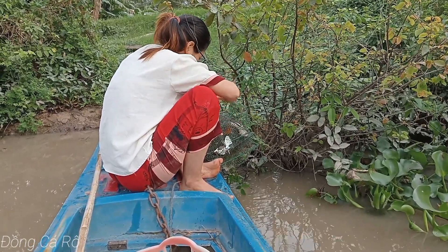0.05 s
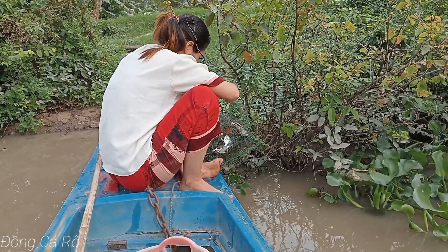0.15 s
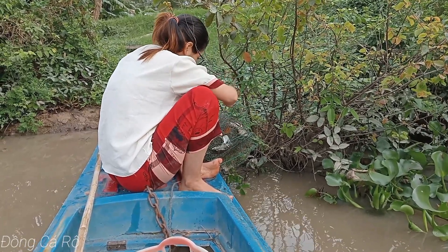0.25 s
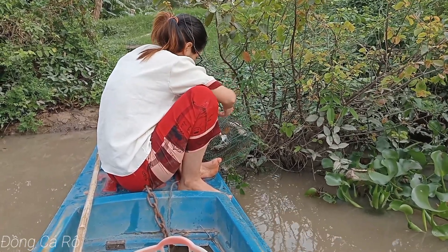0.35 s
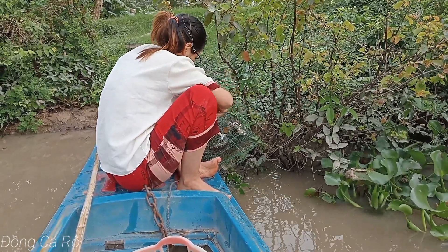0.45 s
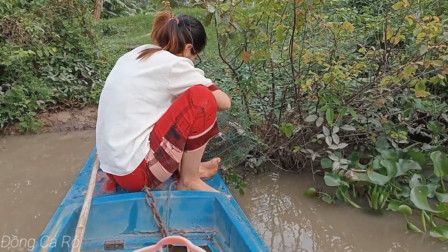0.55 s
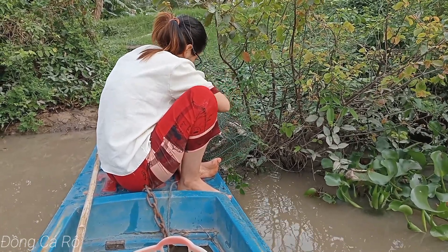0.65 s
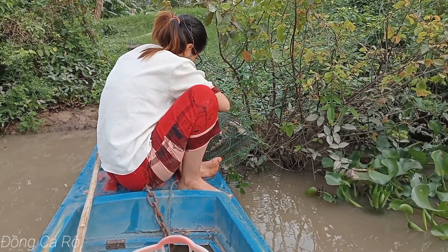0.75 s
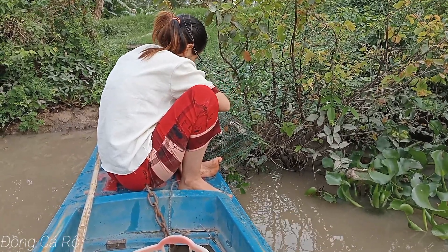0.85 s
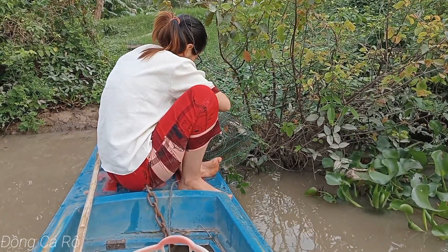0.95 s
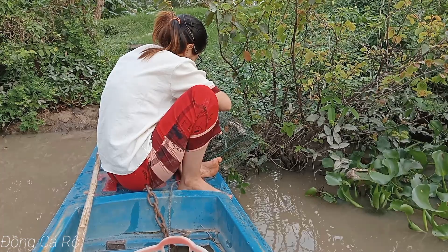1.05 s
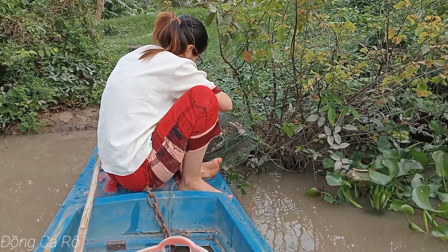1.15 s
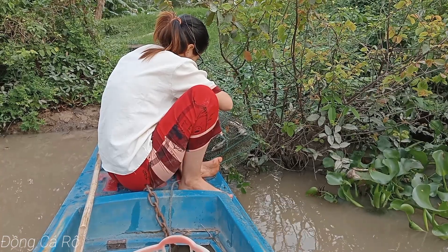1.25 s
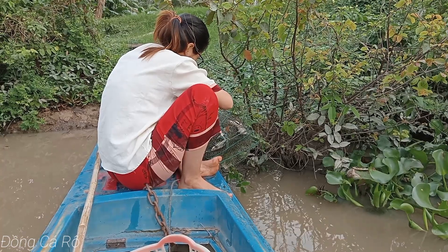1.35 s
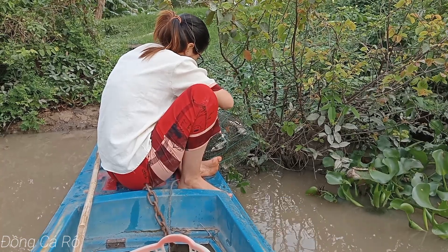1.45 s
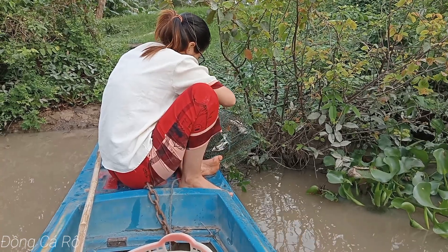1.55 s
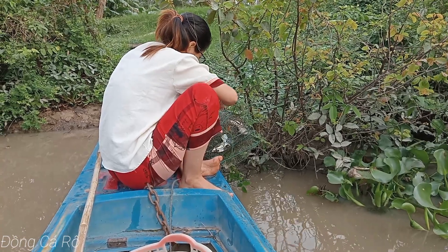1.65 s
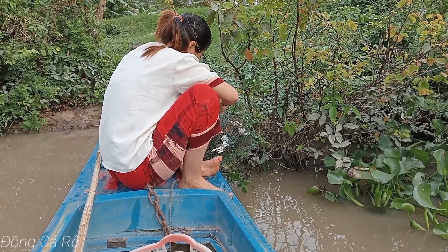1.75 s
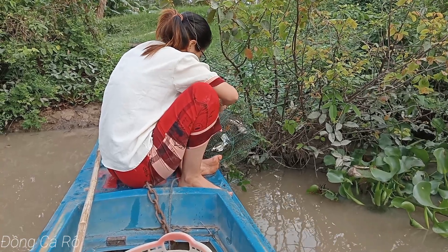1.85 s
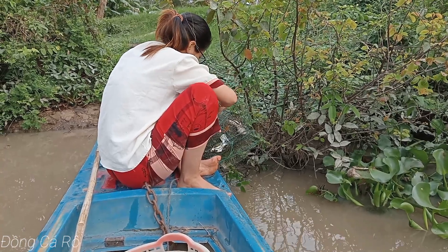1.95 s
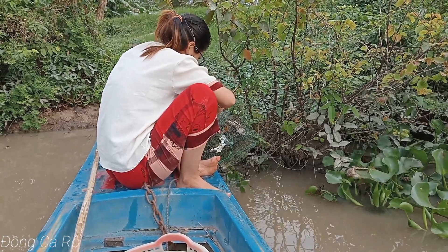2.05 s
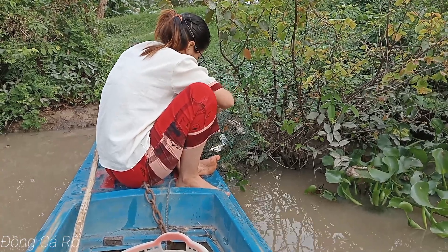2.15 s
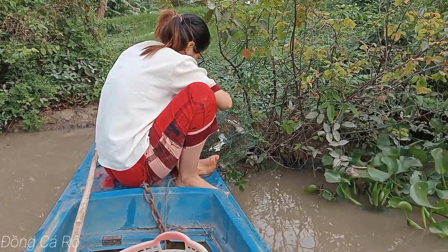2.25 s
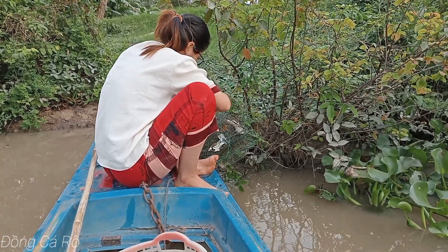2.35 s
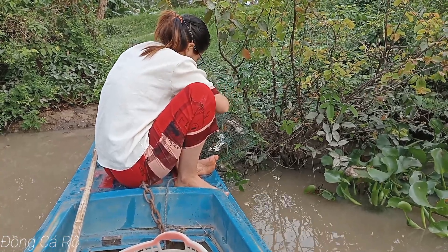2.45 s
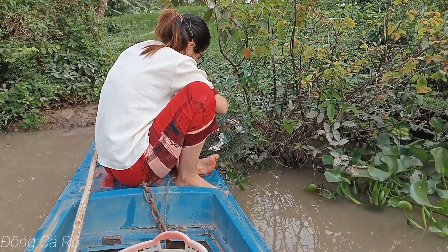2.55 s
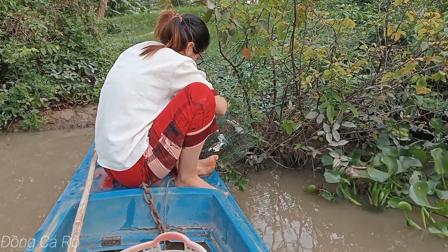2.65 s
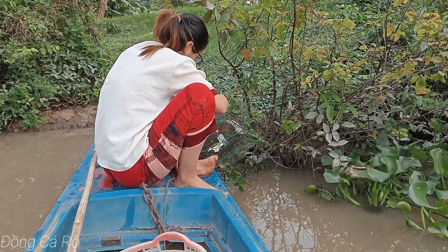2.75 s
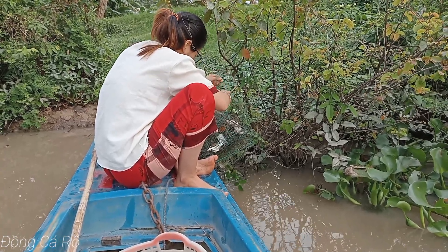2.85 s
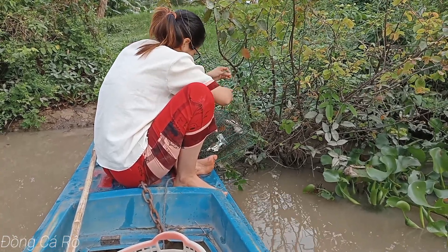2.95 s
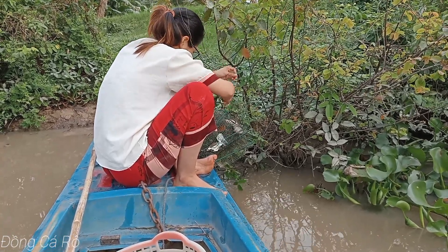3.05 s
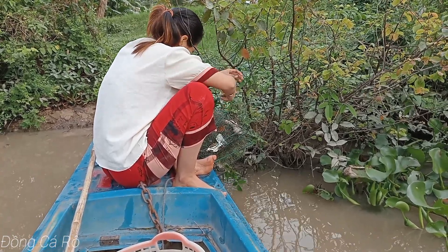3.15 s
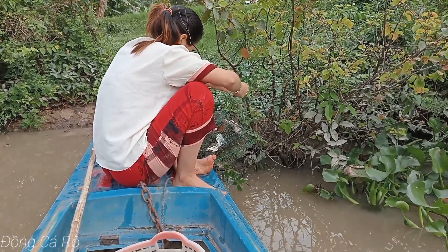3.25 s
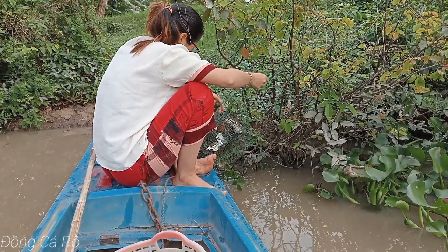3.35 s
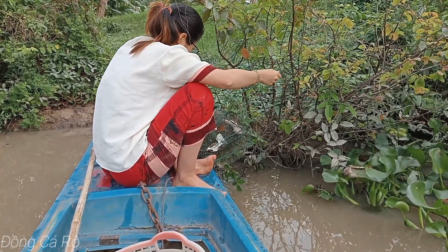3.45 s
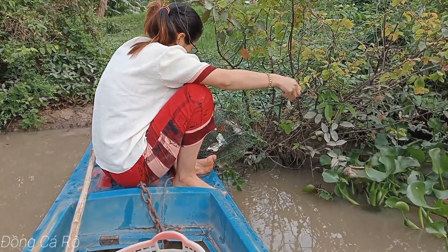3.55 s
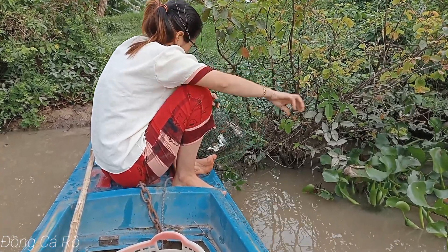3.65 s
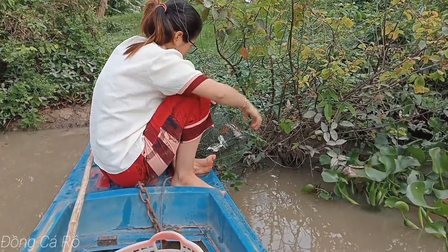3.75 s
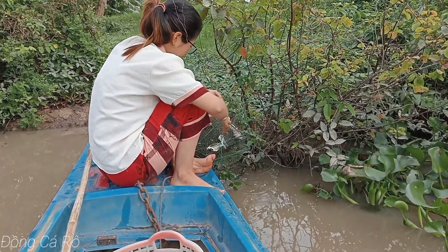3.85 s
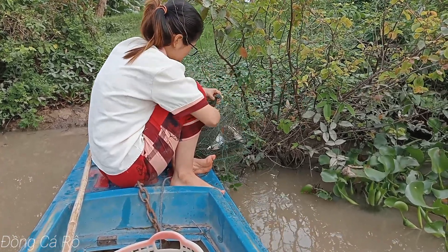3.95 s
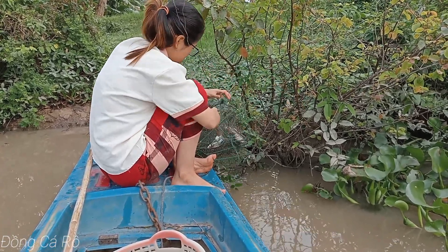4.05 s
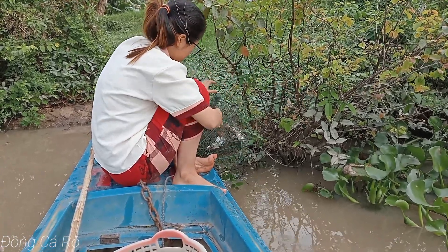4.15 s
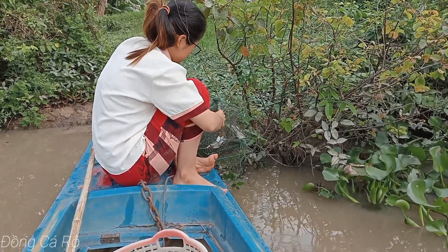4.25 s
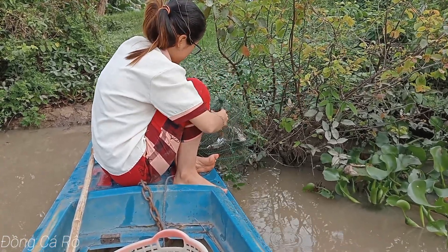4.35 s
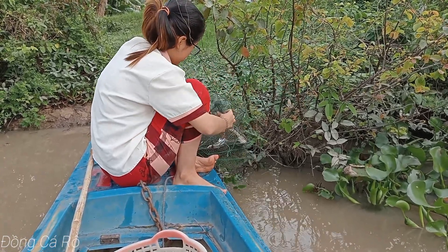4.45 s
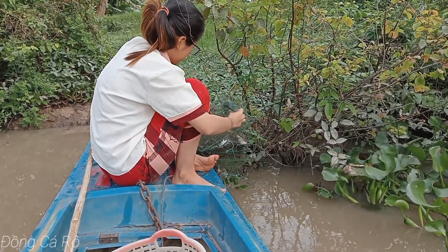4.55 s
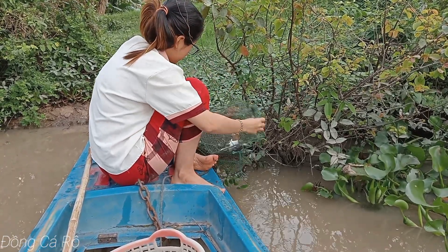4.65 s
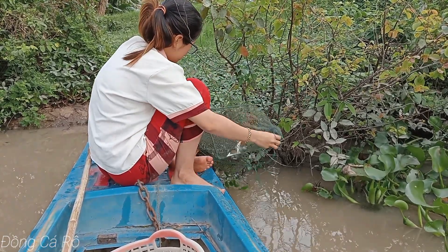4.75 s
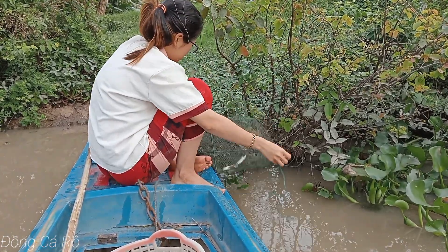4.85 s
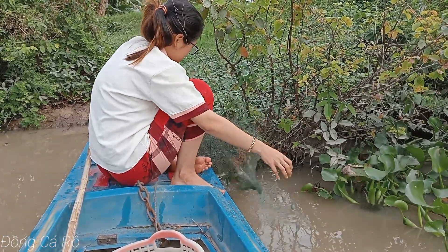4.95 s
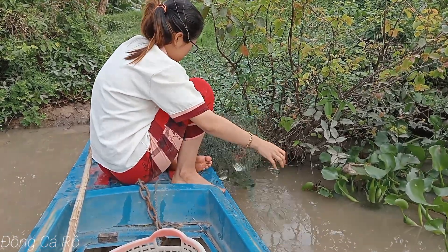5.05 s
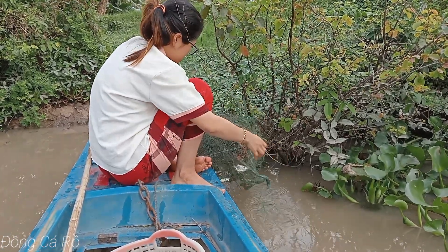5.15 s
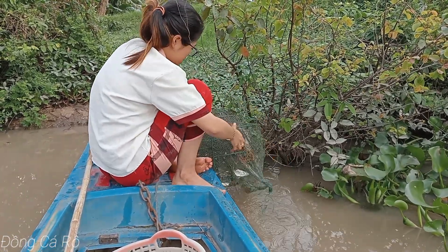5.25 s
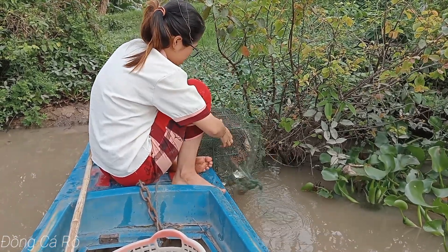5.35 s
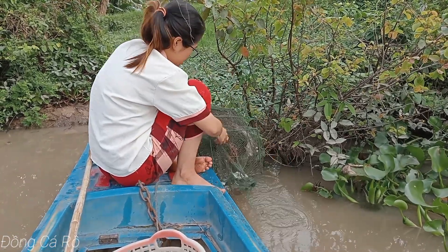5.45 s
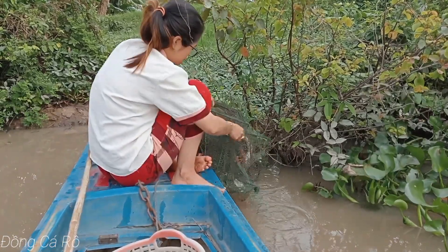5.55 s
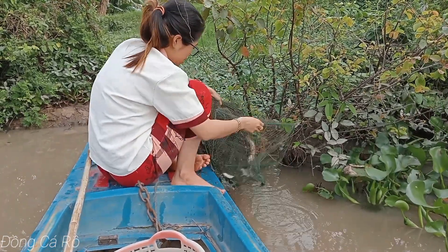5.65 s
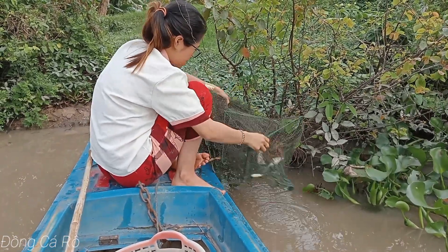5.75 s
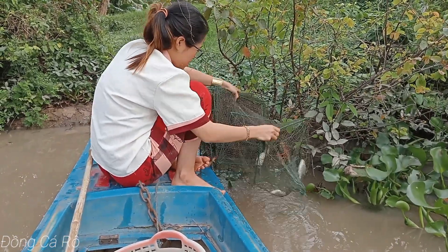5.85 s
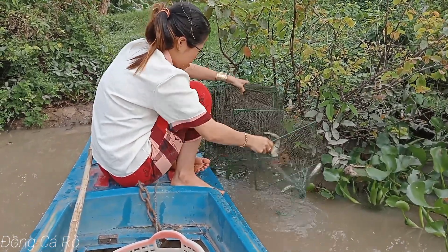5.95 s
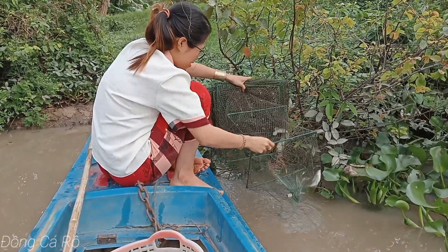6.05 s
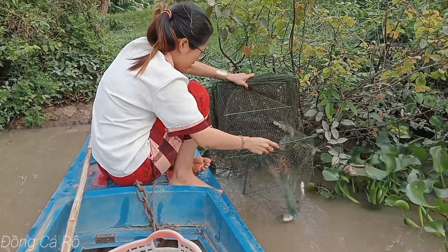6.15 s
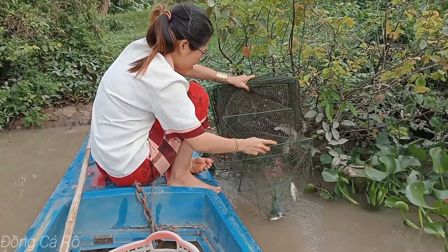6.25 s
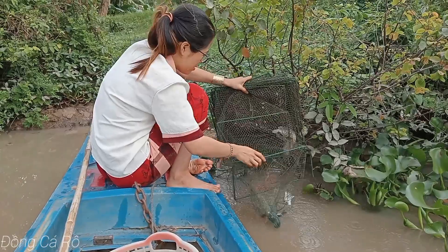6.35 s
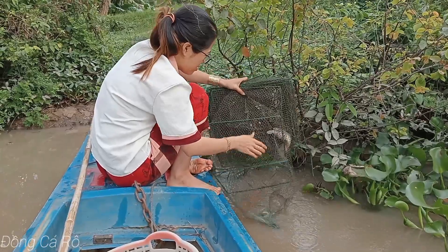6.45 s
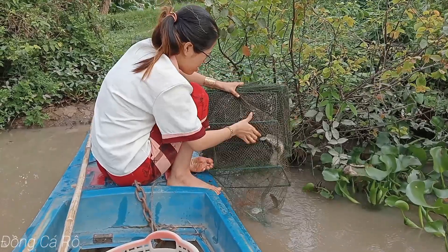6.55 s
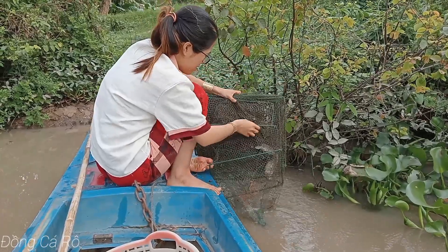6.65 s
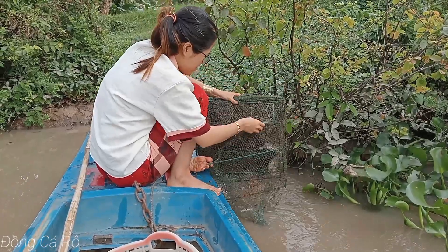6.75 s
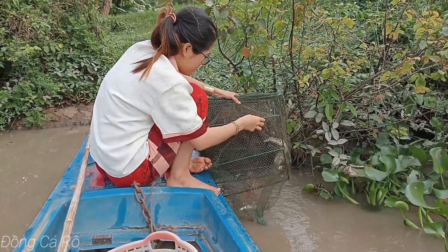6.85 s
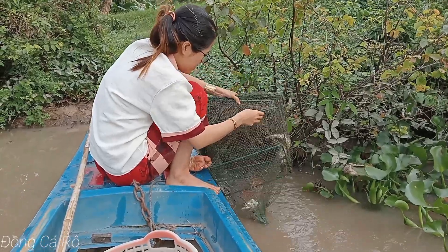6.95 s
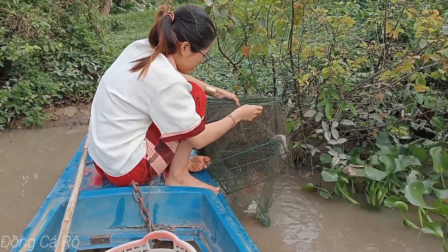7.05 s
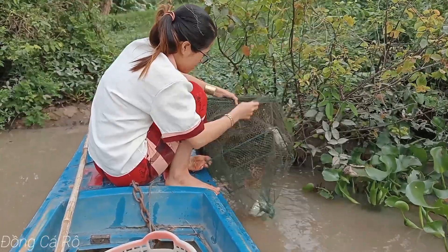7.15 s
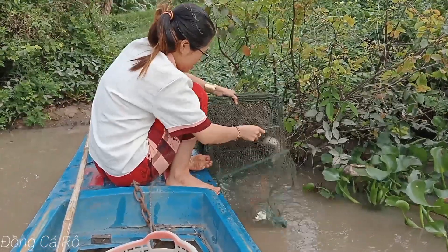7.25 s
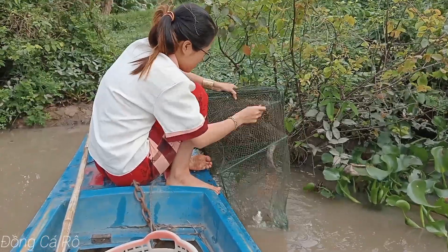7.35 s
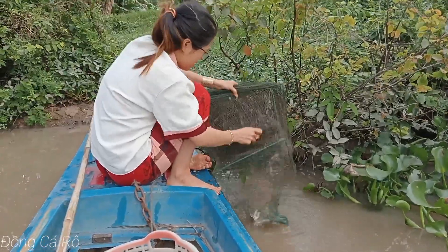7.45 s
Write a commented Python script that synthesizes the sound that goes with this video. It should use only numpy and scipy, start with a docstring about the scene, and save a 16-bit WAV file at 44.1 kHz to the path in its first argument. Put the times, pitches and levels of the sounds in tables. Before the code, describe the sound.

Quiet canal bank with distant engine thud, soft hiss and chirping birds, then hollow hull knocks, sharp wire snaps, drips and rustling leaves.

```python
"""An engine throbs far off under a hiss of leaves, water and insects, while wires and twigs snap and rattle
from the very start. A mesh trap is handled and dragged over a small plastic boat by a leafy bank: the hull
knocks, drops fall, birds chirp and whistle, leaves rustle. Snaps and knocks are clicks and noise bursts
through resonances, drops are ringing bubbles, birds are gliding sines, engine and air are filtered noise
and pulses."""
import sys
import numpy as np
from scipy import signal
from scipy.io import wavfile
from scipy.ndimage import uniform_filter1d

SR = 44100
rng = np.random.default_rng(int(sys.argv[2]) if len(sys.argv) > 2 else 0)


def waveform_to_disk(signal):
    """Save audio, clipped to [-1, 1], as 16-bit WAV at the path in sys.argv[1]."""
    frames = np.transpose(np.atleast_2d(signal))
    scaled = np.clip(frames, -1, 1) * 32767
    samples = np.round(scaled).astype(np.int16)
    wavfile.write(sys.argv[1], SR, samples)


def invert_db(x):
    """Field ratio 10**(x/20) for x, a level in decibels (scalar or array-like)."""
    u = np.asarray(x, float) / 20
    return 10 ** u


N = 330915
T = np.arange(N) / SR

# far engine, swelling and sinking as the air carries it: (time [s], level [dB])
ENGINE_SWELL = [(0, -51.5), (.3, -50.5), (.85, -57.5), (1.4, -52.5), (1.85, -48.5), (2.4, -54),
                (3.1, -56.5), (3.5, -52), (4, -49), (4.8, -56), (5.4, -51.5), (5.75, -53), (6.1, -54.5),
                (6.7, -50), (7.05, -55), (7.5, -49.5)]
# exhaust resonances: (centre [Hz], width [Hz], gain [dB])
EXHAUST_MODES = [(73.7, 62, -2.5), (103, 39.2, 5.5), (159.4, 61.5, -7.5)]
# spectrum of the distant hiss: (frequency [Hz], relative density [dB per Hz])
AIR_SPECTRUM = [(120, -30), (200, 4.5), (259, -12), (360, 7.5), (416, -8.5), (867, -6), (2330, -15),
                (3830, -17), (6640, -30), (7830, -48), (8580, -60), (10100, -33.5), (14900, -57),
                (16000, -25)]
# slow swell of the hiss: (time [s], gain [dB])
HISS_SWELL = [(0, -0.5), (.6, -1.5), (1.3, -0.5), (2, 2), (2.7, 0), (3.4, 0.5), (4, -0.5), (5.5, -2),
              (7.5, 2)]
# faint hum that comes and goes: (time [s], level [dB])
HUM_SWELL = [(0, -85), (1, -77), (2, -68), (3, -73.5), (4, -117), (7.5, -101)]
# wire and twig snaps: (time [s], treble level [dB], middle over treble [dB], t60 [s], click over rattle [dB])
SNAP_EVENTS = [(0.0824, -32, 1.5, 0.021, -8), (0.0877, -47, 12, .028, -10), (0.0963, -57.5, 6, .3, 13),
               (0.2454, -45.5, -16, 0.04, 19), (.261, -42.5, 5.5, 0.045, 21), (.7855, -56, -7, 0.051, 0),
               (1.0182, -58, -17, .09, 1), (1.509, -54, -11, 0.073, 15.5), (1.615, -59, -22, .11, 24),
               (1.633, -40, -17, 0.059, -4), (2.4845, -33.5, -37, 0.031, -5), (2.569, -49, -25, .11, -1),
               (2.6117, -37.5, -20, 0.077, -10), (3.3188, -51, -14, .16, 0), (3.8045, -77, 4, 0.12, 20),
               (3.8887, -56, -3, 0.072, 6), (4.1569, -62.5, 4, 0.065, 10), (4.1896, -55, -8, 0.18, -2.5),
               (4.2312, -49, -20, 0.078, 6), (4.276, -55.5, 9, 0.074, 3.5), (4.363, -61.5, 12, 0.047, -5),
               (4.4175, -53.5, -13, .12, 3), (4.4546, -54, 1, .15, 0), (4.474, -43.5, 8.5, 0.099, -1),
               (4.486, -58, -2, 0.048, 11), (4.5372, -44.5, 8.5, 0.073, 6), (4.5557, -53, 17, 0.062, 2),
               (4.7133, -44, 6, 0.16, -10), (4.753, -49, 5.5, .053, 1), (4.794, -53.5, 6.5, 0.43, 0),
               (4.83, -47.5, 9, 0.11, 10), (4.855, -46, 10, 0.049, -4), (4.9468, -44, 3.5, 0.2, 2),
               (4.9589, -29, -9.5, 0.21, 3), (4.97, -34.5, -10.5, 0.14, -21), (4.9895, -31, -7, .06, 0),
               (5.022, -48, -20, .085, 13), (5.073, -38.5, -7, 0.084, 2), (5.1874, -49.5, -10, .057, 17),
               (5.256, -52, 1.5, 0.12, 12), (5.3096, -47.5, -1.5, 0.1, 19.5), (5.511, -39, -14, .09, 3),
               (5.587, -56.5, 13, 0.093, 16.5), (5.6115, -57.5, -4, 0.74, 18), (5.705, -73, 28, 0.072, -3),
               (5.74, -73, 27, 0.12, -6), (5.8265, -38.5, -18, 0.037, 9.5), (5.948, -53.5, 0, 0.43, 9),
               (5.9876, -36.5, -8.5, 0.14, 18), (6.0051, -34, -12, .06, 16), (6.039, -41, -11, 0.038, 14),
               (6.0754, -17, -7, 0.083, 17), (6.1219, -52, 8, 0.058, 2), (6.14, -36.5, 5.5, 0.11, -10),
               (6.152, -44.5, 10.5, 0.061, -3), (6.242, -36.5, -19, 0.055, 18), (6.273, -67, 23, .21, -2),
               (6.2896, -39, -1.5, .056, 17), (6.3444, -55, -7, .12, 3), (6.3754, -40, -13, 0.044, 10),
               (6.4108, -61.5, 13.5, 0.13, -1), (6.449, -46, 0, .066, 10.5),
               (6.5126, -33, -18.5, 0.093, 13), (6.546, -58.5, 11.5, 0.1, 13), (6.579, -64, 11.5, 0.13, 8),
               (6.661, -73, 27, 0.14, 1), (6.7168, -67.5, 20, 0.19, 12), (6.849, -50.5, -4.5, .13, 14),
               (6.8568, -48.5, -7, 0.32, 4), (6.909, -56, 1, 0.22, 1), (7.2757, -60, 5, .08, 14),
               (7.2905, -52, -1, 0.47, 3), (7.334, -44, -10, 0.29, -2), (7.3608, -46, 5, 0.14, 0),
               (7.372, -40, 2, 0.096, 4), (7.382, -38, -8, 0.087, 4), (7.395, -41, 5.5, 0.18, 4),
               (7.4167, -49, -2, 0.079, 14)]
# snaps that shake one stiff wire into a single note: (time [s], level [dB], note [Hz], t60 [s])
WIRE_NOTES = [(0.0827, -14, 4050, 0.039), (0.2611, -11, 5580, .012), (4.5372, -29, 2100, .04),
              (4.722, -36, 2600, .05), (6.038, -25.5, 4400, .04), (6.14, -35, 2600, .15),
              (6.2883, -32, 2900, .03)]
# knocks on the hull: (time [s], level [dB], upper over lower modes [dB], drag [s])
HULL_KNOCKS = [(0.092, -53.5, 13, 0.0083), (0.257, -45.5, 7.5, 0.0097), (4.184, -40, -5, 0.026),
               (4.368, -47, 3, 0.0053), (4.451, -50.5, 15.5, 0.032), (4.472, -34, 5.5, 0.038),
               (4.534, -39.5, 11.5, 0.0069), (4.555, -40, 11, 0.0077), (4.711, -35, 7, 0.022),
               (4.753, -37, 4, 0.0095), (4.798, -25.5, 3.5, 0.028), (4.831, -26, 0.5, 0.024),
               (4.853, -34.5, 5, 0.014), (4.955, -25.5, -10, 0.032), (4.976, -30.5, -1, 0.012),
               (5.132, -49, 2, 0.01), (5.213, -20.5, -6.5, 0.012), (5.253, -34, -26, 0.035),
               (5.435, -48, -21, 0.017), (5.51, -32, 0, 0.017), (5.583, -36.5, 4, 0.019),
               (5.608, -35.5, -12, 0.025), (5.662, -27, -7.5, 0.015), (5.704, -35, 7.5, 0.014),
               (5.767, -35, -14, 0.0056), (5.869, -32.5, -3, 0.015), (5.891, -38, 0, 0.025),
               (5.947, -48.5, 13, 0.015), (5.978, -44, 14, 0.024), (5.997, -24, 1, 0.0084),
               (6.074, -42.5, 22, 0.0074), (6.141, -46, 17.5, 0.021), (6.281, -40.5, 9.5, 0.012),
               (6.408, -48, 4, 0.018), (6.438, -30.5, -10, 0.013), (6.56, -30.5, 5.5, 0.0098),
               (6.661, -30, 3, 0.019), (6.689, -33.5, -19, 0.022), (6.719, -30, 6, 0.013),
               (7.371, -31, -1, 0.014), (7.399, -38, -2.5, 0.013), (7.49, -33.5, 3.5, 0.016)]
# lower hull modes, shifted at each knock: (centre [Hz], width [Hz], gain [dB])
LOW_MODES = [(173, 40, 0.5), (284.6, 49, 0.5), (388, 210, -12)]
# upper hull modes, shifted at each knock: (centre [Hz], width [Hz], gain [dB])
HIGH_MODES = [(544, 69, -6.5), (687, 45, -4), (812, 92, -7.5), (1111, 79, -10.5), (1280, 590, -17)]
# water drops: (time [s], level [dB], starting pitch [Hz], t60 [s])
DROP_EVENTS = [(0.098, -37.5, 1335, 0.016), (0.272, -38, 1390, 0.015), (.412, -55, 6330, .02),
               (2.02, -54.5, 557, 0.25), (2.497, -53, 2100, 0.032), (2.632, -45, 2030, 0.039),
               (3.392, -42.5, 2445, 0.052), (3.804, -38.5, 2050, 0.0072), (3.949, -51.5, 2870, 0.035),
               (4.947, -41, 1750, 0.026), (5.257, -44, 1750, 0.033), (5.328, -50.5, 5560, .04),
               (5.3, -50, 900, .05), (5.635, -48, 1720, .04), (5.707, -38, 1390, .03),
               (5.95, -48.5, 3100, .03), (6.374, -50.5, 3670, 0.035), (6.546, -43, 1790, 0.066),
               (6.76, -51, 3720, 0.033), (6.925, -59, 5950, .02), (7.313, -41, 3040, .025),
               (7.32, -46, 2550, 0.024), (7.325, -41.5, 5340, 0.018), (7.347, -42.5, 1870, 0.047),
               (7.36, -35, 4670, 0.015), (7.389, -34.5, 2260, 0.043), (7.404, -42, 1270, 0.024),
               (7.482, -38, 2160, 0.019)]
# contour of one chirp, stretched and rescaled for each call: (time [s], pitch [Hz], level [dB])
CHIRP_CONTOUR = [(0, 2594, -20), (.008, 3450, -5.5), (.014, 4836, -1.5), (0.021, 4060, -1.5),
                 (.030, 3670, -1.5), (0.039, 3170, -5.5), (0.052, 2550, -12), (.060, 2330, -17),
                 (.066, 2320, -36)]
# chirps of the near bird: (time [s], level [dB], top pitch [Hz], end pitch [Hz], length factor [1])
CHIRP_CALLS = [(0.099, -38, 4850, 2330, 0.9), (0.233, -41, 4300, 2293, 0.79),
               (3.543, -37, 4750, 2330, 0.95), (3.686, -36.5, 4274, 2293, .88),
               (7.429, -37.5, 5020, 2524, 0.88)]
# chirp echoes off the water and the near bank: (delay [s], gain [dB])
BANK_ECHOES = [(.004, -11), (.011, -15)]
# whistles of birds further away: (time [s], length [s], starting pitch [Hz], level [dB], waver [Hz])
FAR_WHISTLES = [(1.72, .16, 3500, -68, 30), (2.37, .07, 4280, -75, 60), (2.6, .05, 3350, -70, 150),
                (3.8, .09, 3500, -67, 60), (4.2, .09, 4200, -70, 80), (4.865, .08, 3150, -61, 25),
                (5.35, .07, 3950, -70, 25), (6.85, .045, 4480, -57, 60), (6.89, .025, 4000, -62, 250),
                (6.955, .115, 3290, -61, 30), (6.93, .2, 2250, -65, 300), (7.16, .09, 3880, -66, 60),
                (7.255, .1, 3070, -61, 30)]
# the wet trap on the move: (time [s], pull through the leaves [dB], weight on the hull [dB])
TRAP_MOTION = [(3.1, -82, -81), (3.65, -64, -61), (4.091, -76, -80), (4.47, -70.5, -55.5), (4.78, -65, -48),
               (4.99, -57, -49), (5.31, -62, -52), (5.54, -63, -51.5), (5.7, -64.5, -34.5),
               (5.95, -57, -59), (6.1, -62, -45.5), (6.19, -50, -61), (6.45, -60, -54.5),
               (6.63, -64.5, -59), (6.76, -59.5, -44.5), (6.9, -68, -69), (7.2, -62.5, -77),
               (7.33, -58, -75), (7.38, -40, -62), (7.45, -57, -53), (7.5, -48, -66)]

CYCLE_S, FIRST_THUD_S, THUD_JITTER_S = 0.1352, 0.058, 0.0044
THUD_SCATTER_DB, RUMBLE_FLICKER_DB = 3, 2.5
AIR_DB, INSECT_DB, CHORUS_DB = -61, -72.5, -83
INSECT_HZ, INSECT_WIDTH_HZ, HUM_HZ, HUM_WIDTH_HZ = 7836, 520, 896, 40
TICKS, TICK_DB = 20, -66  # faint ticks at chance moments
CLUMP_S, CLUMP_DB = 0.0025, 4  # the rattle comes in short uneven clumps
TWIG_HZ, TWIG_HZ_PER_DB = 3230, -62  # thick twigs, strong in the middle band, sound lower
RING_SHARPNESS = 2.6  # note Hz over width Hz
HULL_RING_DB, HULL_T60_S = 9.5, 0.074
DROP_RISE = 0.15  # share by which the pitch climbs in one t60
WHISTLE_SAG_HZ_PER_S = 900
LEAVES_DB, MESH_DB, TRICKLE_DB, RUB_DB = -5, -4.5, -16, -4.2
MIC_HZ, MIC_WIDTH_HZ, MIC_DB, MIC_ROLL_HZ, TOP_HZ = 10220, 850, 11.5, 12140, 15900


def level(x, db):
    """Scale to an rms level."""
    return x * invert_db(db) / np.sqrt(np.mean(x ** 2))


def curve(table):
    """Gain over time from rows of (s, dB)."""
    return invert_db(np.interp(T, *np.transpose(table)))


def band(x, hz, width_hz):
    """Two-pole resonance, gain 1 at the centre."""
    return signal.lfilter(*signal.iirpeak(hz, hz / width_hz, fs=SR), x)


def twice_band(x, hz, width_hz):
    """The same resonance twice, for steeper skirts."""
    return band(band(x, hz, width_hz), hz, width_hz)


def body(x, modes):
    """A set of resonances with alternating signs."""
    return sum((-1) ** k * invert_db(db) * band(x, hz, width_hz) for k, (hz, width_hz, db) in enumerate(modes))


def highpass(x, hz):
    """Steep high-pass."""
    return signal.sosfilt(signal.butter(4, hz, "high", fs=SR, output="sos"), x)


def add(out, s, x):
    """Mix a short sound in at time s."""
    i = int(s * SR)
    out[i:i + len(x)] += x[:len(out) - i]


def walk(rate_hz):
    """Random levels held 1 / rate_hz and slewed twice; spread near 1."""
    k = int(SR / rate_hz)
    held = np.repeat(rng.standard_normal(N // k + 1), k)
    return 1.3 * uniform_filter1d(uniform_filter1d(held, k), k)[:N]


def grit(size, spread_db):
    """Noise of tiny contacts: most are weak, a few strong."""
    x = rng.standard_normal(size) * invert_db(spread_db * rng.exponential(size=size))
    return x / np.sqrt(np.mean(x ** 2))


def foliage(x, t60_s, db):
    """The sound plus its scattered return from leaves and banks."""
    t = T[:SR // 2]
    noise = rng.standard_normal(len(t)) * invert_db(-60 * t / t60_s) * (t > 0.004)
    tail = level(noise, db) / np.sqrt(len(t))
    return x + signal.fftconvolve(x, tail)[:N]


def engine():
    """A slow single cylinder thuds through its exhaust, blurred by distance into a rumble."""
    # distance smears part of the thud into noise
    push = 1.54 * invert_db(RUMBLE_FLICKER_DB * walk(16)) * rng.standard_normal(N) / np.sqrt(SR * CYCLE_S)
    chance = rng.standard_normal((60, 2))
    times = FIRST_THUD_S + np.arange(60) * CYCLE_S + THUD_JITTER_S * chance[:, 0]
    heard = times < N / SR
    push[(times[heard] * SR).astype(int)] += invert_db(THUD_SCATTER_DB * chance[heard, 1])
    thud = highpass(band(body(push, EXHAUST_MODES), 142, 200), 27)
    return level(thud, 0) * curve(ENGINE_SWELL)


def air():
    """Distant hiss of leaves and water: third-octave noise bands, each flickering a little."""
    spectrum_hz, spectrum_db = np.transpose(AIR_SPECTRUM)
    hiss = 0
    for hz in 200 * 2 ** np.arange(0, 6.4, 1 / 3):
        db = np.interp(np.log(hz), np.log(spectrum_hz), spectrum_db) + 1.2 * walk(6.7)
        hiss = hiss + invert_db(db) * twice_band(rng.standard_normal(N), hz, hz / 3)
    return curve(HISS_SWELL) * level(hiss, AIR_DB)


def insects():
    """A narrow band of high noise, slightly flickering."""
    hiss = twice_band(rng.standard_normal(N), INSECT_HZ, INSECT_WIDTH_HZ)
    return level(hiss * invert_db(0.47 * walk(24)), INSECT_DB)


def hum():
    """Noise through one narrow resonance: a faint wavering hum."""
    return level(band(rng.standard_normal(N), HUM_HZ, HUM_WIDTH_HZ), 0) * curve(HUM_SWELL)


def snaps():
    """A sharp click, then a rattle of grit that dies away; each piece of wire rings a few notes of its own."""
    out, t = np.zeros(N), T[:SR // 5]
    ticks = [(a * N / SR, TICK_DB + 8 * b, 14 * c - 12, 0.1, 4) for a, b, c in rng.random((TICKS, 3))]
    events = list(SNAP_EVENTS) + ticks
    for (s, db, mid_db, t60_s, click_db), wire in zip(events, rng.random((len(events), 9))):
        clumps = np.interp(t / CLUMP_S, np.arange(101), rng.standard_normal(101))
        fade = invert_db(-60 * t / max(t60_s, 0.005))
        push = grit(len(t), 1.5) * invert_db(CLUMP_DB * clumps) * fade
        push *= np.sqrt(np.sum(fade ** 2) / np.sum(push ** 2))  # the clumps share out the energy of the snap
        push[0] += 4.15 * invert_db(click_db)
        notes = [(2500 + 1100 * (k + w), 260, 0) for k, w in enumerate(wire)]
        push += 1.7 * body(push, notes)
        hz = TWIG_HZ + TWIG_HZ_PER_DB * mid_db
        middle = invert_db(mid_db) * twice_band(push, hz, 2.07 * hz)
        add(out, s, invert_db(db) * (0.44 * highpass(push, 9900) + 0.92 * middle))
    return foliage(out, 0.16, -22)


def rings():
    """Grit shakes one wire, which answers on its own note."""
    out, t = np.zeros(N), T[:SR // 5]
    for s, db, hz, t60_s in WIRE_NOTES:
        push = grit(len(t), 2.6) * invert_db(db - 60 * t / t60_s)
        add(out, s, twice_band(push, hz, hz / RING_SHARPNESS))
    return foliage(out, 0.16, -24)


def hull():
    """Knocks ring the hollow plastic hull, a little higher or lower with the spot that is struck."""
    out, t = np.zeros(N), T[:SR // 5]
    for (s, db, high_db, drag_s), spot in zip(HULL_KNOCKS, rng.standard_normal((len(HULL_KNOCKS), 2))):
        shape = invert_db(db + HULL_RING_DB) * invert_db(-60 * np.maximum(t - drag_s, 0) / HULL_T60_S)
        shape[:40] *= 3.5  # the first contact is the hardest
        for modes, part_db, shift in zip((LOW_MODES, HIGH_MODES), (0, high_db - 1.5), 1 + 0.05 * spot):
            push = invert_db(part_db) * shape * grit(len(t), 2.8)
            ring = body(push, [(hz * shift, width_hz, mode_db) for hz, width_hz, mode_db in modes])
            centre_hz = modes[1][0]
            add(out, s, band(ring, centre_hz, 1.8 * centre_hz))  # soft contacts leave the far skirts dark
    return out


def bubble(db, hz, t60_s, rise_per_s):
    """A bubble rings briefly while its pitch rises."""
    t = T[:SR // 10]
    tone = np.sin(2 * np.pi * hz * (t + rise_per_s * t * t / 2))
    return invert_db(db - 60 * t / t60_s) * np.minimum(t / 0.00014, 1) * tone


def drops():
    """Single drops that stand out, each one ringing bubble."""
    out = np.zeros(N)
    for s, db, hz, t60_s in DROP_EVENTS:
        add(out, s, bubble(db, hz, t60_s, DROP_RISE / t60_s))
    return foliage(out, 0.033, -6)


def chirps():
    """Gliding sines with a weak octave, echoed by the water and the near bank."""
    out = np.zeros(N)
    at, hz, db = np.transpose(CHIRP_CONTOUR)
    for s, call_db, top_hz, end_hz, stretch in CHIRP_CALLS:
        t = T[:int(at[-1] * stretch * SR)] / stretch
        reach = (top_hz - end_hz) / (hz.max() - hz[-1])
        pitch_hz = end_hz + reach * (np.interp(t, at, hz) - hz[-1])
        phase = 2 * np.pi * np.cumsum(pitch_hz) / SR
        octave = band(invert_db(-18) * np.sin(2 * phase), 4300, 3700)
        call = np.sqrt(2) * invert_db(call_db + np.interp(t, at, db)) * (np.sin(phase) + octave)
        for delay_s, echo_db in [(0, 0.0088)] + list(BANK_ECHOES):
            add(out, s + delay_s, invert_db(echo_db) * call)
    return out


def whistle(out, s, length_s, start_hz, end_hz, db, waver_hz):
    """Mix in one soft note whose pitch wavers."""
    u = np.linspace(0, 1, int(length_s * SR))
    waver = np.interp(u * length_s * 200, np.arange(60), rng.standard_normal(60))
    phase = 2 * np.pi * np.cumsum(start_hz + (end_hz - start_hz) * u + waver_hz * waver) / SR
    add(out, s, np.sqrt(2) * invert_db(db) * np.sin(np.pi * u) ** 0.55 * np.sin(phase))


def birds():
    """Fluttering chirps, far whistles and a blurred chorus of chance notes; all scatter in the leaves."""
    far, chorus = np.zeros((2, N))
    for s, length_s, hz, db, waver_hz in FAR_WHISTLES:
        whistle(far, s, length_s, hz, hz - WHISTLE_SAG_HZ_PER_S * length_s, db, waver_hz)
    for when, length, pitch, glide, loud in rng.random((260, 5)):
        start_hz = 3000 + 1600 * pitch
        end_hz = start_hz + 900 * (glide - 0.6)
        whistle(chorus, when * N / SR, 0.015 + 0.06 * length, start_hz, end_hz, CHORUS_DB + 8 * loud, 200)
    leaves = foliage(chirps() * invert_db(3.5 * walk(350)), 0.14, -9)
    banks = foliage(leaves, 0.6, -16)
    return banks + foliage(far * invert_db(3 * walk(80)), 0.25, -6) + foliage(chorus, 0.45, 5)


def trickle():
    """Water running off the mesh: many tiny bubbles of chance size."""
    out = np.zeros(N)
    for when, size, loud in rng.random((1600, 3)):
        hz = 700 * 9 ** size
        add(out, when * N / SR, bubble(-16 * loud, hz, 25 / hz, 9.7))
    return out


def brush():
    """Leaves rustle in quick uneven bursts, the mesh scratches and drips, the hull murmurs along."""
    s, *columns = np.transpose(TRAP_MOTION)
    pull, weight = (invert_db(np.interp(T, s, c, left=-120)) for c in columns)
    flutter = invert_db(3.0 * walk(60))
    leaves = level(highpass(flutter * grit(N, 3.2), 5400), LEAVES_DB)
    scratch = level(band(flutter * grit(N, 3.9), 3160, 2700), MESH_DB)
    drip = level(trickle(), TRICKLE_DB)
    rub = invert_db(5.0 * walk(40)) * rng.standard_normal(N)
    murmur = level(body(rub, list(LOW_MODES) + list(HIGH_MODES)), RUB_DB)
    return pull * (leaves + scratch + drip) + weight * murmur


def scene():
    """All sources at one microphone."""
    distant = engine() + air() + insects() + hum()
    return (distant + snaps() + rings() + hull() + drops() + birds() + brush())[None]


def band_limit(x):
    """A steep low-pass at the top of the band."""
    return signal.sosfilt(signal.butter(12, 16830, fs=SR, output="sos"), x)


def record(dry):
    """The microphone port rings near 10 kHz and fades above; peaks are rounded; little passes the top edge."""
    x = dry + (invert_db(MIC_DB) - 1) * band(dry, MIC_HZ, MIC_WIDTH_HZ)
    x = np.tanh(signal.sosfilt(signal.butter(2, MIC_ROLL_HZ, fs=SR, output="sos"), x))
    x = signal.sosfilt(signal.cheby2(10, 18, TOP_HZ, fs=SR, output="sos"), x)
    return band_limit(x)


dry = scene()
out = record(dry)
waveform_to_disk(out)
```